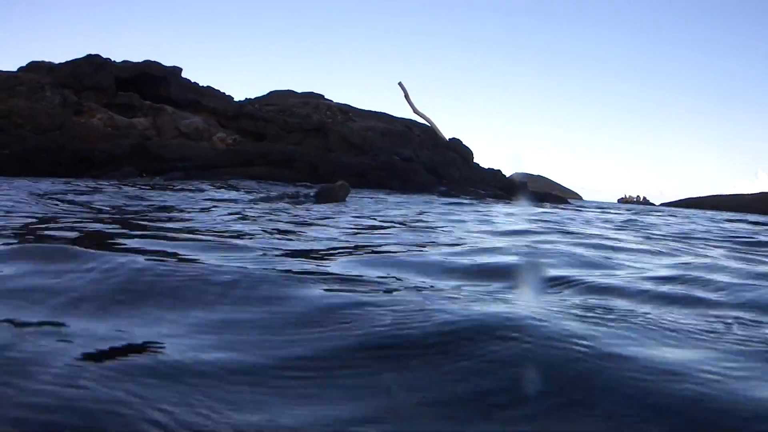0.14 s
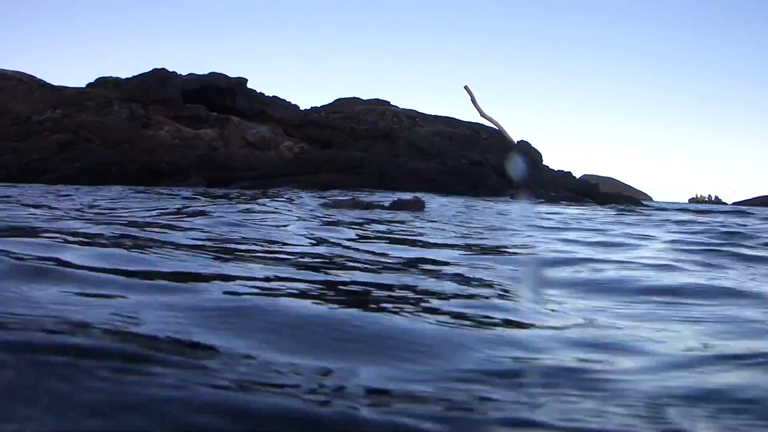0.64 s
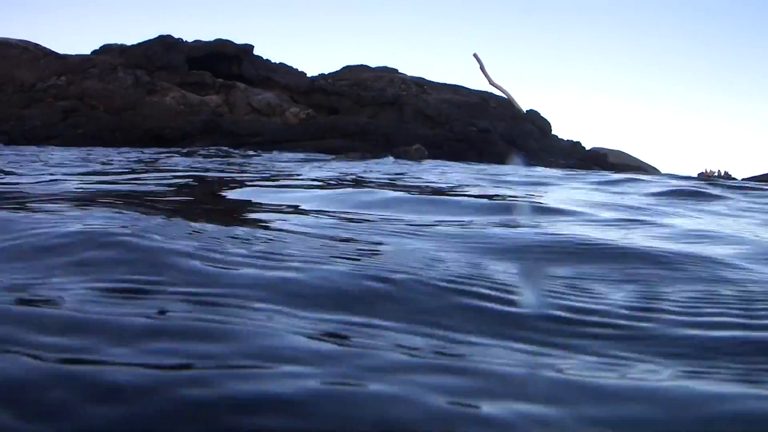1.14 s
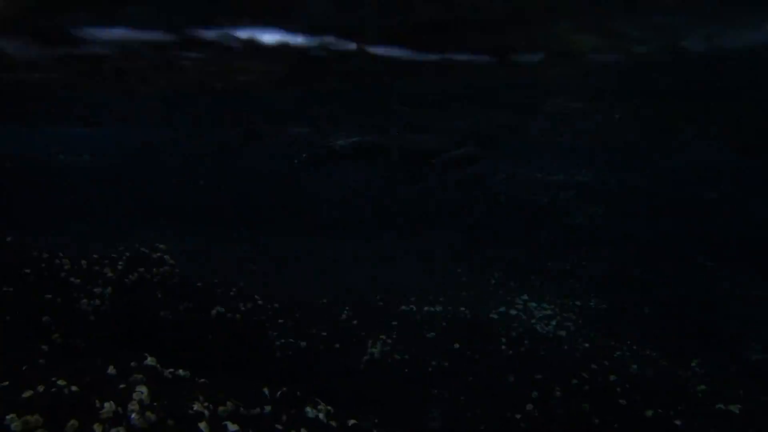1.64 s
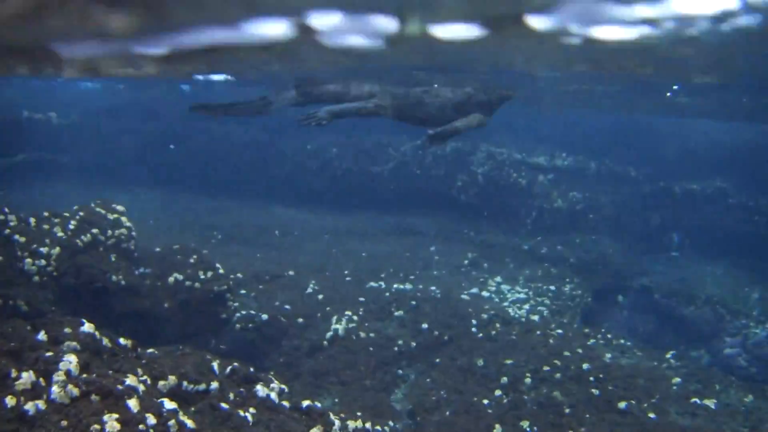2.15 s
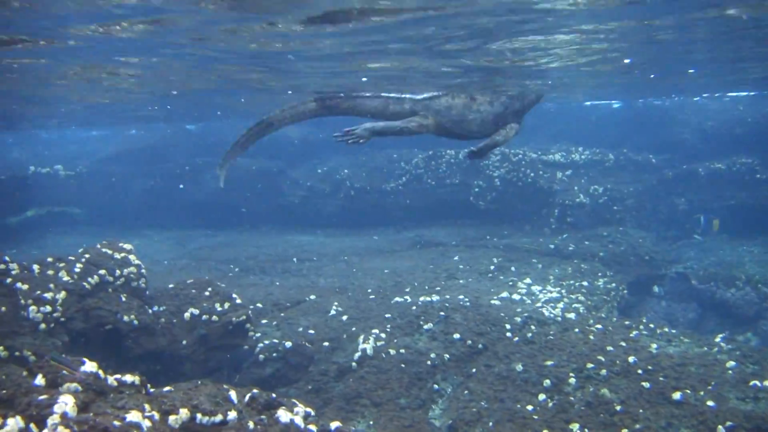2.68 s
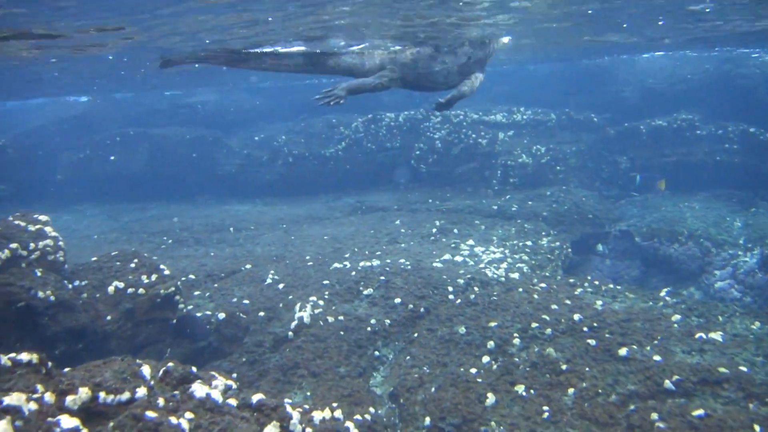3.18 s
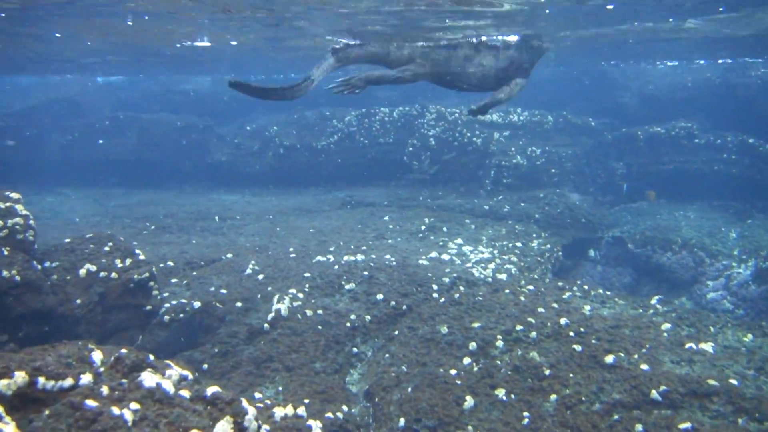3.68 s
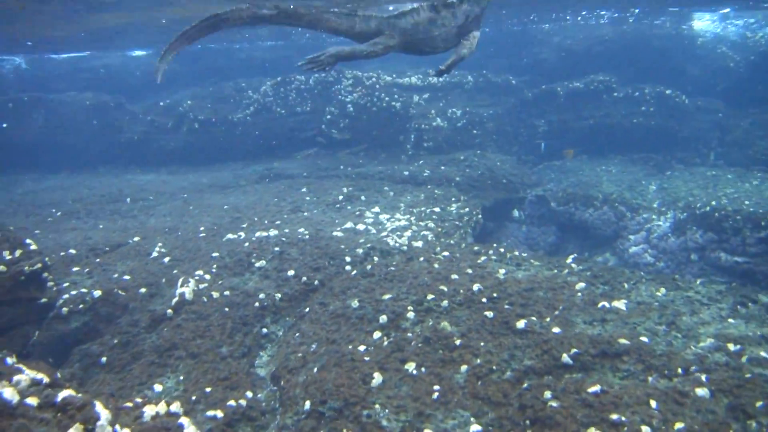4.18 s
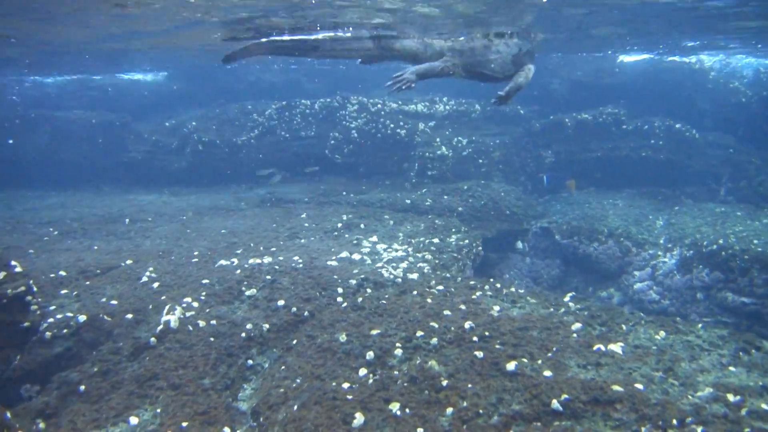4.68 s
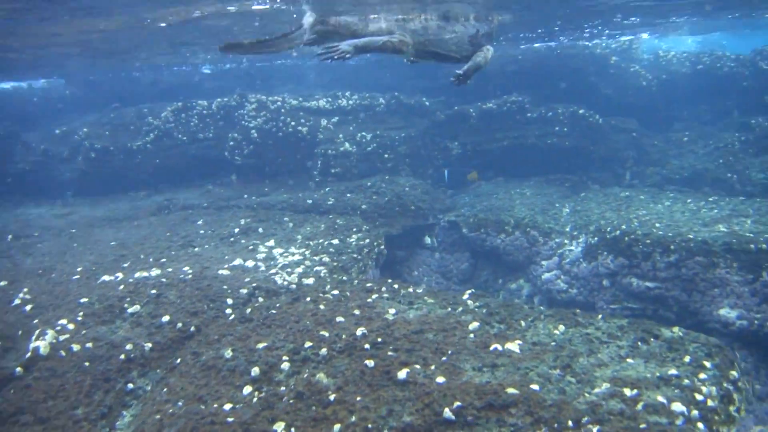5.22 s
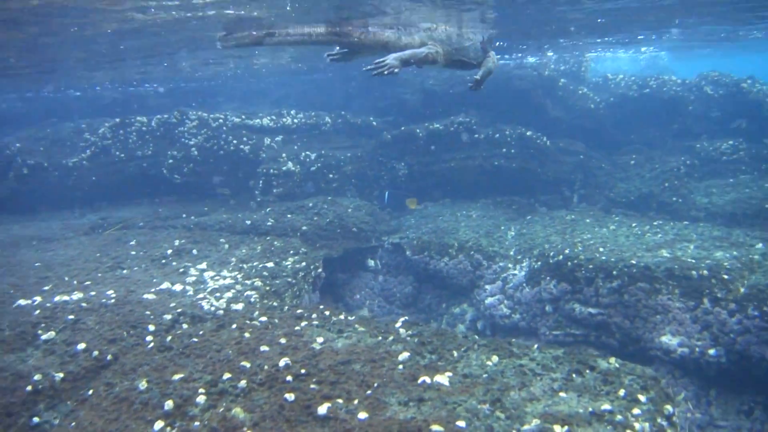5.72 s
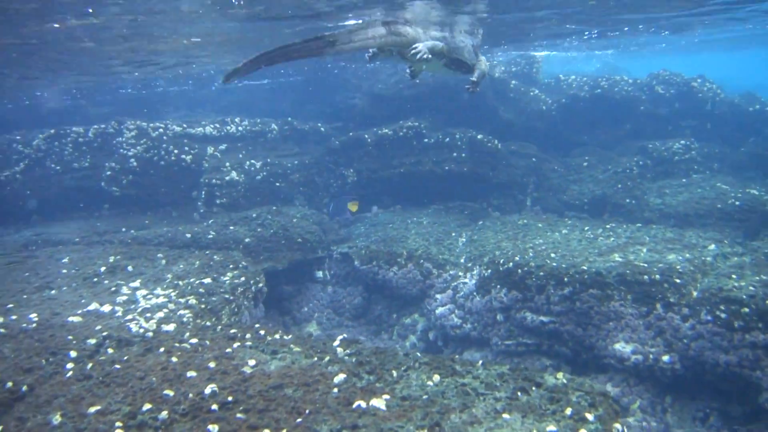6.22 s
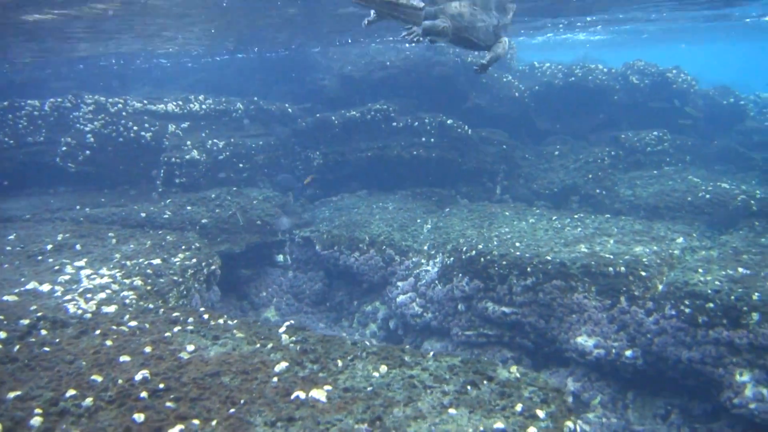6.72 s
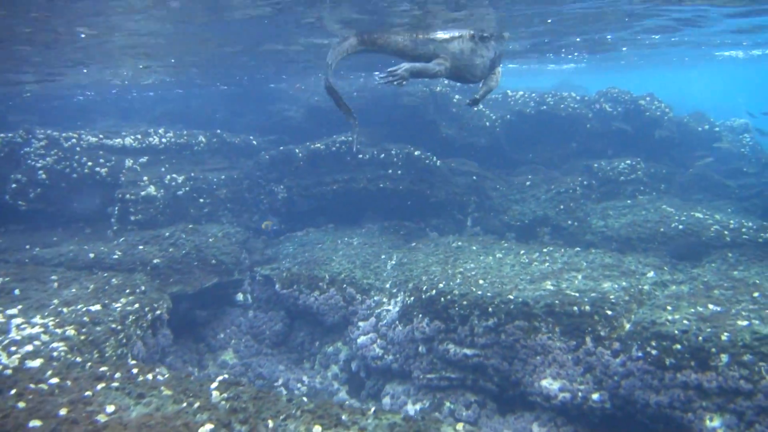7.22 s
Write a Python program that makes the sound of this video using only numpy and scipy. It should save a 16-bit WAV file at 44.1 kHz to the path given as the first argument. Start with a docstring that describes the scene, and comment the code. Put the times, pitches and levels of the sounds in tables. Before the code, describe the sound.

Inside a sealed camera case afloat on the sea, a low fluttering hum and thin hiss run throughout. Loud water slaps, short hollow bubble pops and bright spray ticks strike in uneven clusters. As it dips under, a small motor whirrs in quick steps, low rumble passes and the case creaks. Afterwards only hum, hiss and faint ticks remain as a lizard swims by.

```python
"""A throbbing drive hum over a thin hiss, then water slapping the sealed housing of a camera afloat on the sea.
Air pockets pop as damped sines against the case; spray and reef life tick as rung case modes and noise.
The lens motor whirrs in short steps of shaped noise as the light drops, and holds focus on a thin note.
A low rumble of noise marks the sinking, and the case creaks as its seal slips.
"""
import sys
import numpy as np
from scipy import signal
from scipy.fft import rfft, irfft, next_fast_len
from scipy.io import wavfile
from scipy.ndimage import uniform_filter1d, map_coordinates

SR = 44100
rng = np.random.default_rng(int(sys.argv[2]) if len(sys.argv) > 2 else 0)


def digitize_waveform(pressure):
    """Quantize a signal to 16-bit integers and store it at the path in sys.argv[1].

    Rows of a 2-D input are taken as channels; values are limited to [-1, 1].
    """
    field = np.atleast_2d(pressure).T
    bounded = np.clip(field, -1, 1)
    quanta = np.round(bounded * 32767).astype(np.int16)
    wavfile.write(sys.argv[1], SR, quanta)


def attenuation_scalar(level_db):
    """Turn a level in dB into a linear amplitude multiplier (20 dB per decade)."""
    decades = np.asarray(level_db, float) / 20
    return 10 ** decades


N = 324529

# Colour of the drive hum: pitch_hz, level_db (relative, per Hz)
HUM_COLOUR = [(25, -28), (60, -21), (130, -13), (290, -10), (345, 1), (470, -1.5), (515, -3.5), (590, 2),
              (660, -4.5), (940, -5.5), (990, -11.5), (1050, -2), (1290, -3), (1460, -11), (1580, -8.5),
              (2620, -14), (2900, -20), (3170, -15), (4500, -32.5), (9900, -120)]
# Strength of the hum's swells over time: start_s, least_level_db
SWELL_LEVELS = [(0, -39), (.4, -41), (1.0, -41), (1.35, -39), (1.74, -39.5), (1.99, -42.5), (2.15, -41),
                (2.45, -40.5), (2.65, -39.5), (2.9, -40), (4.1, -41.5), (4.45, -43), (4.8, -40.5),
                (5.2, -42.5), (5.75, -41), (6.2, -41), (6.85, -40.5), (7.36, -41)]
# Colour of the water hiss: pitch_hz, level_db (relative, per Hz)
HISS_COLOUR = [(1760, -5), (3000, -7), (4540, -12), (5920, -11.5), (9940, -15), (11700, -22), (12800, -29),
               (13500, -52), (14700, -19), (16000, -34)]
# How alike hum and hiss are on the two sides: pitch_hz, likeness (0 to 1)
SIDE_LIKENESS = [(100, 0.082), (350, 0.68), (2200, 0.27), (3200, 0.42), (10000, 0.33)]
# How hum and hiss lean to the left: pitch_hz, left_over_right_db
SIDE_LEAN = [(60, -1), (130, -2.5), (290, 3.5), (640, 7.5), (1410, 3), (3100, 6), (6820, -2.5), (15000, 9)]
# How far the left side leads in hum and hiss: pitch_hz, lead_rad
SIDE_LEAD = [(100, -5.5), (300, -0.2), (430, -0.25), (650, -1), (950, 1), (1050, -0.5), (1450, -1),
             (1750, 1.5), (2100, -4), (2450, 0.5), (2800, 2), (3600, 5.5), (4600, 4), (8000, 3.5),
             (9200, 4), (12000, 5.5)]
# Spans in which the lens holds focus: start_s, end_s
FOCUS_HOLDS = [(0, 2.2), (2.76, 6.66)]
# Spray drops and snaps: start_s, level_db, centre_hz, left_over_right_db
CLEAR_TICKS = [(0.1698, -27, 7840, -8), (0.1832, -22, 5000, -9), (0.1866, -20, 5300, -15),
               (0.191, -21, 5270, 15), (.1908, -27, 9700, 0), (0.1971, -21.5, 4950, -16),
               (0.208, -24, 7060, 3), (0.1874, -20, 13000, -5), (0.197, -27, 13000, -5),
               (0.486, -30.5, 4360, -1), (.575, -34, 7550, 0), (0.579, -25, 4500, -7),
               (0.704, -37, 8910, 5), (0.741, -26, 8300, -5.5), (1.031, -9, 10100, 2.5),
               (1.187, -38, 8140, 1), (1.4377, -26, 5000, -10), (1.4406, -33, 5500, 3),
               (1.443, -32, 3600, -1), (1.376, -38, 6500, 0), (1.587, -33, 4600, -4),
               (1.495, -27.5, 9500, -2), (1.5052, -36, 8320, 10), (1.5124, -34, 4560, -7),
               (1.5297, -17, 5030, -7), (1.5923, -20.5, 7930, -5), (1.613, -21, 8400, -2),
               (1.6353, -38, 6450, 1), (1.6475, -33, 10300, -1), (1.657, -33, 6500, -11),
               (1.724, -27, 4500, 4), (1.7386, -34, 4900, -6), (1.7467, -9.5, 6500, -1),
               (1.9015, -24, 5900, 6), (2.1007, -28, 5700, -1), (2.2165, -41, 5700, -8),
               (2.2658, -39, 5500, -5), (2.3154, -43, 9000, 3), (2.2993, -27, 10200, -7),
               (2.4575, -16, 10500, 8), (2.4583, -24, 12800, -4), (2.4635, -34, 9500, 0),
               (2.4778, -22, 4600, -4), (2.478, -23, 7200, -3), (2.4806, -28, 10100, 10),
               (2.4952, -34, 9890, 20), (2.4988, -15, 5340, -2), (2.5108, -27, 4000, -1),
               (2.511, -33, 8500, 0), (2.587, -39, 5540, -5), (2.8425, -42, 5830, -4),
               (2.8994, -32.5, 5830, -1), (3.1415, -39, 9910, 4), (3.8, -46.5, 7600, -33),
               (4.263, -35, 5770, -10), (4.4225, -38, 9430, -2), (4.489, -35, 6060, -1),
               (4.503, -26, 5300, -6), (4.5194, -31, 8650, -1), (5.139, -42, 6800, -21),
               (5.084, -40, 6300, -4.5), (5.557, -37, 7440, -18), (5.6104, -41, 7670, -2),
               (6.121, -35, 4300, -2), (6.121, -38, 8000, -2), (6.3807, -37, 5400, -3),
               (6.6553, -38, 9700, 8), (6.6764, -34, 5600, -12), (6.737, -40, 4640, -4),
               (6.8, -50, 6500, -5), (7.023, -35, 6100, -12), (7.28, -39.5, 6040, -7)]
# High modes of the case, before scatter: pitch_hz
SHELL_MODES = [3200, 4310, 4950, 5910, 6090, 7920, 9830, 9660, 10530]
# Dull pops of water on the case: start_s, level_db, pitch_hz, left_over_right_db
DULL_POPS = [(0.1866, 2, 895, 5), (0.1868, -6, 2685, 23), (0.1978, 5.5, 2700, -2.5), (0.1977, -4.5, 970, 1),
             (0.012, -12.5, 1730, -1.5), (0.4854, -20, 700, 6), (0.486, -14.5, 1820, -1),
             (0.5812, -17, 3500, -4.5), (0.7404, -9.5, 1740, -3), (.7438, -14, 1901, 5),
             (0.7519, -12, 1110, 8), (.7805, -19, 565, 5), (0.8085, -17, 2000, 0), (1.4353, -17, 805, 0),
             (1.437, -1, 710, 0), (1.436, -21, 1759, 6), (1.4375, -17, 2222, -4), (1.4975, -16, 392, 5),
             (1.5075, -15, 1900, 1), (1.514, -11, 1700, -7), (1.594, -12, 1880, -2),
             (1.613, -8.5, 1300, -3), (1.6434, -15, 2970, 0), (1.644, -14, 810, -6), (1.722, 2.5, 660, 2.5),
             (1.7228, -5.5, 1700, 3), (1.7225, 4, 3970, -6), (1.7335, -25, 1850, 0), (1.7465, 3.5, 560, 4),
             (1.7475, 4, 787, 1), (1.7472, -0.5, 3200, 0), (1.761, -10, 2500, -3), (1.91, -9, 3170, 2),
             (1.927, -16, 1700, 2), (2.168, -24, 1600, 0), (2.2688, -16, 2290, 0), (2.292, -24, 1500, 0),
             (2.3535, -20.5, 3680, -7), (2.2677, -14.5, 790, -10), (2.3533, -4.5, 1650, -3),
             (2.353, -10, 400, 0), (2.441, -28, 140, 0), (2.4583, -12, 1880, -1), (2.4775, -12.5, 700, 1),
             (2.4994, -3, 1580, 3), (2.499, -11.5, 3200, -5.5), (2.478, -17, 2600, 0),
             (2.4992, -15, 650, 10), (2.5106, -16, 400, 0), (2.51, -10, 1900, 0), (2.5123, -6, 1200, -12),
             (4.503, -25, 3600, 0), (7.251, -13.5, 450, 1), (7.249, -29, 141.5, 0)]
# Air pockets that ring on: start_s, level_db, pitch_hz, t60_s, left_over_right_db
AIR_POCKETS = [(0.1871, 2.5, 2107, 0.011, 3.5), (0.1905, -19, 2040, 0.035, -3),
               (0.1978, 1.5, 3790, 0.0091, 1), (0.579, -9, 2006, 0.013, 0), (0.5786, -7.5, 547, 0.031, 6),
               (0.5787, 6, 834, 0.011, -2), (.5795, -13, 666, 0.014, 2), (0.5791, -11, 1410, 0.016, 2),
               (0.5877, -30, 810, 0.056, -2), (0.7052, -21.5, 1080, 0.029, -7),
               (0.7543, -23.5, 874, 0.076, -8), (0.7872, -28, 1230, 0.033, 2),
               (0.774, -25.5, 546, 0.02, 17), (0.8086, -11.5, 1530, 0.01, 4), (.812, -23.5, 1485, 0.028, 5),
               (1.032, -14.5, 1830, 0.0035, 0), (1.4379, 2.5, 1750, 0.012, 0), (1.443, -25, 1850, .012, 2),
               (1.4425, -23, 700, .015, 0), (1.5287, -8.5, 1773, 0.021, -6), (1.535, -28, 1790, .015, -3),
               (1.5298, -5.5, 3460, 0.0059, -3), (1.5309, -6.5, 1150, 0.01, -11),
               (1.558, -16, 1010, 0.02, 5), (1.5948, -11, 640, 0.027, 2), (1.6177, -18.5, 610, 0.02, 3),
               (1.637, -25.5, 3030, 0.014, 7), (1.6434, -10, 1780, 0.0074, 0), (1.7235, -25, 550, 0.077, 0),
               (1.7224, -15, 3800, 0.008, -9), (1.7473, 4.5, 1620, 0.01, 0), (1.751, -12, 606, 0.019, 6),
               (1.757, -24.5, 150, 0.1, 1.5), (1.826, -27, 3600, 0.0045, -13),
               (1.911, -14.5, 1840, 0.0089, -6), (1.916, -15, 742, 0.032, 4),
               (2.168, -27, 4000, 0.0076, -5), (2.2005, -24.5, 606, 0.022, 1),
               (2.225, -23.5, 620, 0.029, 0), (2.248, -21, 585, 0.025, 2), (2.273, -21, 656, 0.032, -1),
               (2.2668, -27.5, 4030, 0.0069, -1), (2.3103, -14.5, 590, 0.014, -1),
               (2.32, -34, 150, 0.081, 1), (2.3484, -21.5, 2100, 0.034, -2), (2.357, -24, 135, 0.069, 1),
               (2.4703, -20.5, 450, 0.032, -1), (2.501, -16.5, 2100, 0.014, -1),
               (2.4945, -23, 1600, .012, 2), (3.142, -25, 407, 0.039, 3), (3.256, -30, 610, 0.039, 14),
               (4.2646, -26, 2680, 0.011, -4), (4.489, -32, 3200, .01, 0), (5.484, -19, 460, 0.056, 0),
               (7.2509, -14.5, 1750, .008, 0), (7.251, -24.5, 2400, 0.01, -4)]
# Steps of the lens motor: start_s, level_db
MOTOR_STEPS = [(1.772, -43), (1.805, -42.5), (1.838, -38.5), (1.871, -36.5), (1.904, -31.5), (1.938, -33)]
# Colour of the motor's whirr: pitch_hz, level_db (relative, per Hz)
WHIRR_COLOUR = [(1200, -3.5), (2000, 6), (3300, -3), (5190, -7.5), (5830, 5.5), (6380, -2.5), (8360, 4),
                (9100, 9), (9700, 10.5), (10300, 3), (10900, -2), (11500, -10), (13000, -9), (13500, -30)]
# Spells of rumble as water closes over the case: start_s, end_s, level_db
SINKING_SPELLS = [(2.196, 2.373, -48), (2.442, 2.646, -44.5)]
# Colour of the rumble: pitch_hz, level_db (relative, per Hz)
RUMBLE_COLOUR = [(20, -15), (60, 2), (110, -9), (200, -15), (400, -120)]
# Slips of the case seal: start_s, level_db
SEAL_SLIPS = [(2.5308, -20.5), (2.556, -17), (2.5763, -18.5), (2.5977, -19.5), (2.6249, -18.5)]
# Case modes rung by a slip, before scatter: pitch_hz, level_db (relative), t60_s
CASE_MODES = [(460, 2, 0.014), (1110, -2, 0.022), (1764, 8.5, 0.013), (1950, 0, 0.014), (2530, 3, 0.005),
              (6500, -17, 0.0044)]

PICTURES_PER_S = 29.97


def unit(x):
    """Scales a sound to rms 1."""
    return x / np.sqrt(np.mean(x ** 2) + 1e-20)


def along(points, hz):
    """Reads a curve of (Hz, value) points on a log pitch axis."""
    f, v = np.transpose(points)
    return np.interp(np.log(hz + 1), np.log(f + 1), v)


def wobble(rate):
    """A smooth random curve with rate knots a second."""
    knots = rng.standard_normal(int(N * rate / SR) + 4)
    return map_coordinates(knots, [np.arange(N) * rate / SR])


def filtered(x, response):
    """Shapes x by a complex response of frequency."""
    m = next_fast_len(x.shape[-1] + 8192)
    spectrum = rfft(x, m) * response(np.fft.rfftfreq(m, 1 / SR))
    return irfft(spectrum, m)[..., :x.shape[-1]]


def ports(colour, patchy_db):
    """Noise reaches the two microphones by different paths, its gain patchy in time and pitch; mid rms is 1."""
    z = signal.stft(rng.standard_normal((2, N)), nperseg=256)[2]
    patches = uniform_filter1d(rng.standard_normal(z.shape[1:]), size=3, axis=0)
    patches = uniform_filter1d(patches, size=10, axis=1)
    pair = signal.istft(z * attenuation_scalar(patchy_db * unit(patches)), nperseg=256)[1][:, :N]

    def spread(hz):
        # the share of mid and side noise sets how alike left and right are
        turn = np.arccos(np.clip(along(SIDE_LIKENESS, hz), 0, 1)) / 2
        return attenuation_scalar(along(colour, hz)) * np.array([np.cos(turn), np.sin(turn)])

    def path(hz):
        return attenuation_scalar(along(SIDE_LEAN, hz) / 2) * np.exp(.5j * along(SIDE_LEAD, hz))

    mid, side = filtered(pair, spread)
    left = filtered(mid + side, path)
    right = filtered(mid - side, lambda hz: 1 / path(hz))
    return np.array([left, right]) / np.sqrt(np.mean((left + right) ** 2) / 4)


def throbs(rest_db, swell_s):
    """Gain of the drive: rest broken by short uneven swells, the stronger prevailing where they overlap."""
    swells_per_s, scatter, spread_db = 19, 0.81, 3  # scatter in gaps between swells
    t, power = np.arange(N) / SR, np.full(N, attenuation_scalar(rest_db) ** 2)
    count = int(N / SR * swells_per_s) + 1
    times = (np.arange(count) + scatter * rng.random(count)) / swells_per_s
    levels_db = np.interp(times, *np.transpose(SWELL_LEVELS)) + spread_db * rng.random(count)
    for s, db in zip(times, levels_db):
        near = slice(max(round((s - swell_s) * SR), 0), round((s + swell_s) * SR))
        swell = attenuation_scalar(db) ** 2 * np.cos(np.pi / 2 * (t[near] - s) / swell_s) ** 2
        power[near] = np.maximum(power[near], swell)
    return np.sqrt(power)


def hum():
    """The drive throbs unevenly: deepest in its lowest resonance, least in its upper part."""
    noise = ports(HUM_COLOUR, patchy_db=0.8)
    low = filtered(noise, lambda hz: 1 / (1 + (hz / 460) ** 6))
    high = filtered(noise, lambda hz: 1 - 1 / (1 + (hz / 2200) ** 2))
    middle = noise - low - high
    # the low part flutters once for each picture
    flutter_db = 2.0 * np.cos(2 * np.pi * PICTURES_PER_S * (np.arange(N) / SR - .0215))
    throb = throbs(rest_db=-45.0, swell_s=0.029) * attenuation_scalar(1.34 * wobble(80))
    middle_part = throb * attenuation_scalar(1.2 * wobble(55)) * middle
    low_part = attenuation_scalar(11.5 + 0.63 * wobble(15) + flutter_db) * throb ** 1.31 * low
    high_part = attenuation_scalar(-18.5) * throb ** .5 * high
    return middle_part + low_part + high_part


def water():
    """Thin steady hiss of shaped noise that flutters a little."""
    return attenuation_scalar(-53.5 + 1.2 * wobble(24)) * ports(HISS_COLOUR, patchy_db=1.7)


def lens_whistle():
    """Holding focus, the lens motor sings a thin band of noise that swells once for each picture, to the right."""
    t = np.arange(N) / SR
    pulse = (t - MOTOR_STEPS[0][0]) * PICTURES_PER_S % 1 < .55
    gate = .5 + uniform_filter1d(1. * pulse, size=90)
    holding = sum((t > start) & (t < end) for start, end in FOCUS_HOLDS)
    note = unit(filtered(rng.standard_normal(N), lambda hz: 1 / (1 + ((hz - 5750) / 90) ** 2)))
    return attenuation_scalar(-70.5 + 1.4 * wobble(12)) * gate * holding * note * attenuation_scalar([[-2.5], [2.5]])


def add(pair, s, sound, pan_db, lag_ms=0):
    """Lays a sound into the stereo pair at s seconds, left over right by pan_db and lagging by lag_ms."""
    sound = np.broadcast_to(attenuation_scalar([[pan_db / 2], [-pan_db / 2]]) * sound, (2, sound.shape[-1]))
    for side, part, sign in zip(pair, sound, (1, -1)):
        first = max(round((s + sign * lag_ms / 2000) * SR), 0)
        room = side[first:][:len(part)]
        room += part[:len(room)]


def tick(hz, t60, wide):
    """A click rings the case modes near its centre, unlike at each microphone, in a puff of noise."""
    t = np.arange(SR // 25) / SR

    def colour(f):
        # a bump of log width wide on a floor, with a falling top
        bump = np.exp(-.5 * (np.log(f / hz + 1e-9) / wide) ** 2)
        return (0.23 + bump) / (1 + (f / 11000) ** 4)

    count = len(SHELL_MODES)
    modes = np.array(SHELL_MODES) * rng.normal(1, 0.044, count)
    strength = colour(modes) * attenuation_scalar(rng.normal(0, 2.5, (2, count)))
    phase = 2 * np.pi * modes[:, None] * t + rng.normal(0, 1.0, (2, count, 1))
    rung = np.sum(strength[..., None] * np.sin(phase), axis=1)
    puff = unit(filtered(rng.standard_normal((2, len(t))), colour))
    envelope = attenuation_scalar(-60 * t / max(t60, .002)) * (1 - np.exp(-t / 0.00016))
    click = (unit(rung) + 0.93 * puff) * envelope
    return click / np.abs(click.mean(axis=0)).max()


def ticks():
    """Spray and snaps ring the case, over a faint crackle of far snaps at random."""
    t60_s = 0.0057
    out = np.zeros((2, N))
    for s, db, hz, pan in CLEAR_TICKS:
        wide = .18 + .0055 * (db + 40)  # stronger ticks are broader
        add(out, s, attenuation_scalar(db) * tick(hz, t60_s, wide), pan)
    for when, size, pitch in rng.random((260, 3)):
        snap = tick(4000 * 2.4 ** pitch, t60_s, wide=0.6)
        add(out, when * N / SR, attenuation_scalar(-47.5 + 4.7 * size ** 4) * snap, -2.5)
    return out


def ring(hz, t60, rise=0.00052, bend=1):
    """A damped sine with a quick soft start; bend over 1 holds the level first, then lets it drop."""
    t = np.arange(SR // 5) / SR
    decay = attenuation_scalar(-60 * (t / max(t60, .002)) ** bend)
    return decay * (1 - np.exp(-t / rise)) ** 2 * np.sin(2 * np.pi * hz * t)


def left_lag_ms(pan_db):
    """Left lag of a water sound, shrinking as it leans left."""
    return .05 - .005 * pan_db


def pops():
    """Water slaps the case in dull, heavily damped sines that first suck and die in a few cycles."""
    out = np.zeros((2, N))
    for s, db, hz, pan in DULL_POPS:
        pop = ring(hz, 4.14 / hz, rise=0.36 / hz, bend=1.3)  # 60 dB down in 4.14 cycles, at least 2 ms
        add(out, s, -attenuation_scalar(db) * pop, pan, left_lag_ms(pan))
    return out


def bubbles():
    """Each air pocket first sucks, then rings at the pitch of its size, wavering in level every few cycles."""
    out = np.zeros((2, N))
    t = np.arange(SR // 5) / SR
    for s, db, hz, t60, pan in AIR_POCKETS:
        knots = np.r_[0, 0, rng.standard_normal(14)]
        shake_db = 2 * np.interp(t * hz, np.r_[0, 3:60:4], knots)  # knots placed in cycles
        pocket = ring(hz, t60, rise=0.29 / hz, bend=1.056)
        add(out, s, -attenuation_scalar(db + shake_db) * pocket, pan, left_lag_ms(pan))
    return out


def lens_motor():
    """Each step is a rough 18 ms whirr of noise, running on faintly until the next, nearer the left microphone."""
    out, t = np.zeros((2, N)), np.arange(SR // 25) / SR
    gate = np.clip(t / 0.00037, 0, 1) * np.clip((.0195 - t) / 0.003, .06, 1) * (t < .033)
    for s, db in MOTOR_STEPS:
        teeth = attenuation_scalar(3.5 * rng.standard_normal(40)[(t * 800).astype(int)])  # gear teeth catch unevenly
        shared, own = rng.standard_normal(len(t)), rng.standard_normal((2, len(t)))
        whirr = unit(filtered(shared + 3.4 * own, lambda hz: attenuation_scalar(along(WHIRR_COLOUR, hz))))
        add(out, s, attenuation_scalar(db) * gate * teeth * whirr, 6)
    return out


def rumble():
    """Lumpy low pressure, partly shared, pushes on each microphone while the case sinks."""
    t = np.arange(N) / SR
    gate = sum(attenuation_scalar(db) * np.clip(np.minimum(t - start, end - t) / .015, 0, 1)
               for start, end, db in SINKING_SPELLS)
    push = rng.standard_normal(N) + .5 * rng.standard_normal((2, N))
    low = unit(filtered(push, lambda hz: attenuation_scalar(along(RUMBLE_COLOUR, hz))))
    return gate * attenuation_scalar(1.8 * wobble(40.1)) * low


def creaks():
    """Every slip rings the case modes a little differently; the soft seal dulls all but the top one."""
    out, soft = np.zeros((2, N)), signal.butter(8, 2650, fs=SR, output="sos")
    for s, db in SEAL_SLIPS:
        modes = []
        for hz, level, t60 in CASE_MODES:
            strength = attenuation_scalar(level + rng.normal(0, 1.5))
            modes.append(strength * ring(hz * rng.normal(1, .015), t60, rise=.00015))
        dulled = signal.sosfilt(soft, sum(modes[:-1]))
        add(out, s, attenuation_scalar(db) * (dulled + modes[-1]), 0)
    return out


def scene():
    """All sources as they reach the two microphones."""
    steady = hum() + water() + lens_whistle()
    splashes = ticks() + pops() + bubbles()
    return steady + splashes + lens_motor() + rumble() + creaks()


def band_limit(x):
    """A steep low-pass at the top of the band."""
    return signal.sosfilt(signal.butter(12, 16160, fs=SR, output="sos"), x)


def record(dry):
    """The sealed microphones lose deep bass and top treble; the loudest slaps clip at full scale."""
    low_cut = signal.butter(2, 200, "high", fs=SR, output="sos")
    top_cut = signal.butter(6, 12500, fs=SR, output="sos")
    heard = signal.sosfilt(np.vstack([low_cut, top_cut]), dry)
    return band_limit(np.clip(heard, -1, 1))


dry = scene()
out = record(dry)
digitize_waveform(out)
```